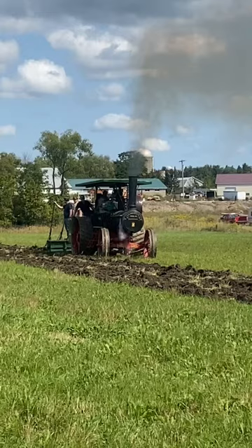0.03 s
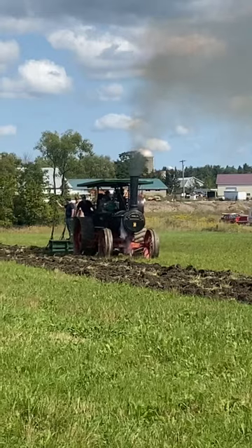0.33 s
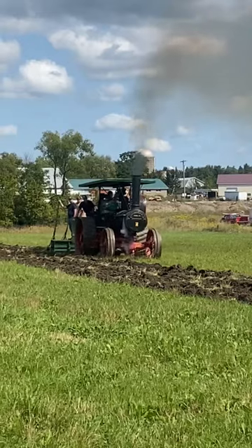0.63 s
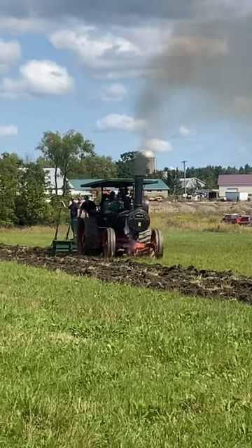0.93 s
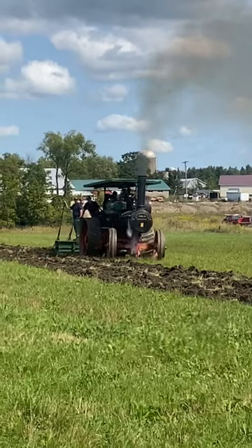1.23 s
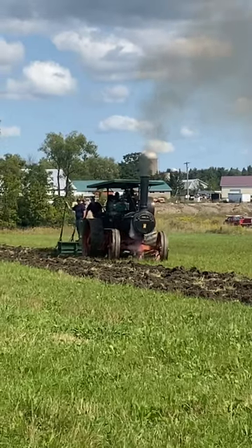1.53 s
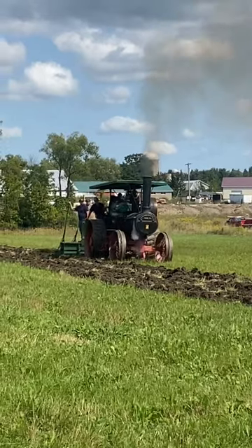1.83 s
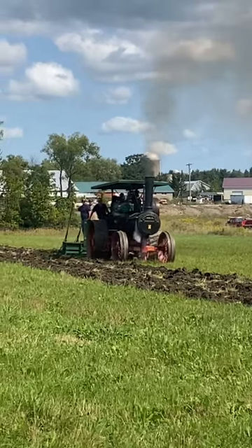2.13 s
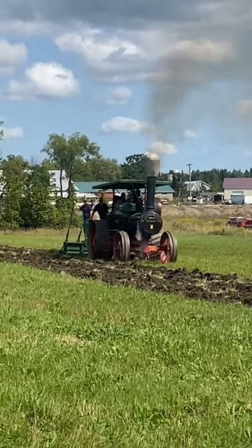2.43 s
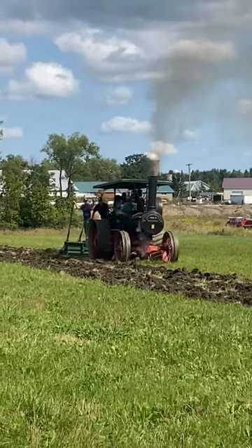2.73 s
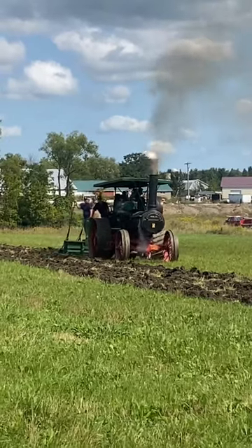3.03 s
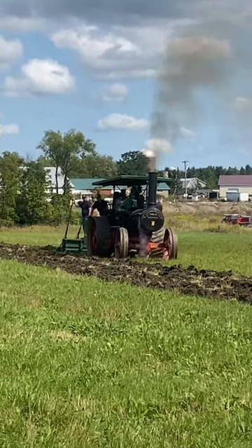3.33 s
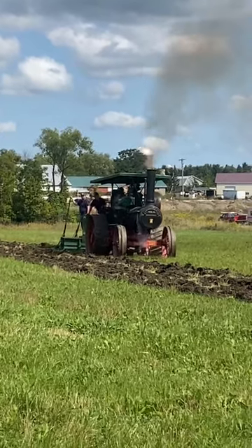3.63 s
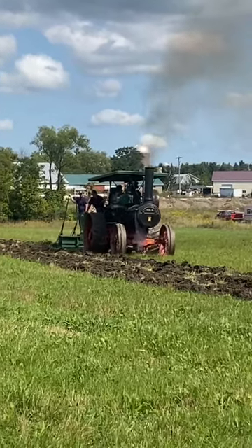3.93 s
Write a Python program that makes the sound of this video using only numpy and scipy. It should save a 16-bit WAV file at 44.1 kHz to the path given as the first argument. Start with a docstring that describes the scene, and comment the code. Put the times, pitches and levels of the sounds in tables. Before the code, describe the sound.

A steam traction engine chuffs in a fast, even rhythm across an open field, with faint boiler hiss and low rumble underneath. Wind buffets and thumps the microphone early on, then eases while the chuffing continues.

```python
"""An open field, where a steam traction engine pulls a plough, chuffing about 6.5 times a second.
Each chuff is a turbulent jet of exhaust steam that excites the resonances of the smokestack,
followed by two weak echoes and diffuse scatter from the field. Beneath the beats the boiler hisses
and the machine rumbles, while wind buffets and slaps a pair of closely spaced microphone ports."""
import sys
import numpy as np
from scipy import signal
from scipy.fft import rfft, irfft
from scipy.io import wavfile

SR = 44100
rng = np.random.default_rng(int(sys.argv[2]) if len(sys.argv) > 2 else 0)


def unload_audio(sound):
    """Save the sound as a 16-bit wav file, at the path given as the first command line argument."""
    columns = np.transpose(np.atleast_2d(sound))
    # keep every value between -1 and 1, then stretch to whole-number steps
    steps = np.round(np.clip(columns, -1, 1) * 32767)
    wavfile.write(sys.argv[1], SR, steps.astype(np.int16))


N = 176400
HZ = np.fft.rfftfreq(N, 1 / SR)
TIME = np.arange(N) / SR

# exhaust beats: t/s at full blast, level/dB, T60/s, body/dB, stack ring/dB, hiss/dB (levels relative)
BEATS = [(0.159, -10, 0.081, 2.5, -4, 3), (0.315, -10, 0.076, -0.8, -2, -0.5),
         (0.469, -11, .11, 0.5, -2, 2.5), (0.626, -9.5, 0.091, 0, -4.5, -2.7),
         (0.781, -11.5, 0.11, -1.5, 1, 2.5), (0.9341, -8.5, 0.078, -.5, -4, -0.9),
         (1.083, -6.5, 0.088, -5, -7, -0.7), (1.233, -6.5, 0.085, -5, -5, -6.5),
         (1.3762, -8.5, 0.12, -2, -5, -1.5), (1.520, -11.5, .11, 2, 0, 0.5),
         (1.664, -9.5, 0.11, 0, -2.5, 1.3), (1.807, -15.5, 0.13, 6, 2, 2.7),
         (1.9488, -9.5, 0.14, .5, -4, 0.9), (2.098, -13, 0.13, 2, 1.5, 3),
         (2.244, -10.5, 0.11, -2, 0.5, 1.8), (2.3996, -11.5, 0.15, 1.3, 0.5, 0.7),
         (2.5547, -10.5, 0.12, 2.5, -1, 2.5), (2.715, -10.5, 0.074, 2.4, .7, 0),
         (2.8755, -11.5, 0.14, 4.5, -4.5, 0.5), (3.0355, -12, .11, 3, -2.5, -0.5),
         (3.191, -13.5, 0.14, 5.5, -2, 2.5), (3.345, -13, 0.13, 3.5, -2.5, 0),
         (3.4958, -12.5, 0.15, 3.5, -3.5, 1.6), (3.647, -15.5, 0.12, 2.5, 4.5, 5.5),
         (3.794, -14.5, 0.15, 3, 0, 6.5), (3.9455, -13.5, 0.15, 2.5, -1.7, 2.5)]


def amp(db):
    """The decibel scale: 20 dB is a factor of ten in amplitude."""
    return 10 ** (np.asarray(db) / 20)


def unit(x):
    """Normalisation to an rms value of 1."""
    return x / np.sqrt(np.mean(x ** 2) + 1e-20)


def read(points, hz):
    """Interpolation of a table on a logarithmic frequency axis."""
    f, value = np.transpose(points)
    return np.interp(np.log(hz + 1), np.log(f + 1), value)


def noise(spectrum):
    """Spectral shaping: white noise filtered to the given relative levels, at rms 1."""
    return unit(irfft(rfft(rng.standard_normal(N)) * amp(read(spectrum, HZ)), N))


def wander(rate_hz):
    """Random modulation: low-pass noise of rms 1 with its cutoff at rate_hz."""
    return unit(irfft(rfft(rng.standard_normal(N)) / (1 + (HZ / rate_hz) ** 4), N))


def rumble():
    """Low-frequency noise of firebox and gearing, an uneven drone under slow amplitude modulation."""
    spectrum = [(20, -47), (45, -8), (75, 10), (120, -4.5), (155, -1), (182, 1.5), (220, -21), (350, -6),
                (600, -53)]  # f/Hz, relative spectral level/dB
    return noise(spectrum) * amp(-42.5 + 0.75 * wander(rate_hz=9.5))


def boiler_hiss():
    """Flow noise of steam and draught: a steady broadband hiss that flickers slightly."""
    spectrum = [(100, -17), (330, 3.5), (1350, 2), (2800, -1), (4200, -7.5), (6000, -12), (9000, -16),
                (12000, -26.5), (16000, -54)]  # f/Hz, relative spectral level/dB
    envelope = [(0, -34.5), (2.6, -37), (4, -36)]  # t/s, level/dB
    flicker_db = wander(rate_hz=40)
    return noise(spectrum) * amp(np.interp(TIME, *np.transpose(envelope)) + flicker_db)


def lulls():
    """Amplitude modulation of the background: a Gaussian dip in gain follows each beat."""
    depth_db, delay_s, width_s = -4.5, 0.084, 0.027
    dips = sum(np.exp(-((TIME - beat[0] - delay_s) / width_s) ** 2) for beat in BEATS)
    return amp(depth_db * dips)


def wind():
    """Turbulent pressure at the microphone: low buffeting, and a flutter of eddies as shot noise."""
    gusts = [(0.04, -21.5, -25.5), (.11, -31.5, -58), (.52, -28, -45), (.88, -32, -46), (0.938, -22, -28.5),
             (1.25, -23, -27.5), (1.41, -27, -37.5), (1.68, -35.5, -28), (1.76, -39, -39.5),
             (1.85, -41, -33), (2.24, -36, -38), (2.35, -39.5, -54), (2.95, -46, -42.5),
             (3.55, -38.5, -32.5), (4, -51, -40)]  # t/s, buffeting level/dB, flutter level/dB
    buffet_spectrum = [(18, -38), (30, -28), (46, 4), (80, -1), (125, -5.5), (200, -5.5), (2000, -115)]  # f/Hz, relative spectral level/dB
    eddy_spectrum = [(40, -33), (120, -5), (200, -3), (350, -5.5), (600, -16.5), (5000, -114)]  # f/Hz, relative spectral level/dB
    eddies_per_s, size_spread_db = 240, 4.5
    times, buffet_db, flutter_db = np.transpose(gusts)
    buffeting = noise(buffet_spectrum) * amp(np.interp(TIME, times, buffet_db))
    sizes = amp(size_spread_db * np.minimum(rng.exponential(1, N), 3))
    signs = rng.choice([-1, 1], N)
    eddies = sizes * signs * (rng.random(N) < eddies_per_s / SR)
    flutter = unit(irfft(rfft(eddies) * amp(read(eddy_spectrum, HZ)), N))
    flurries_db = 2.5 * wander(rate_hz=10)
    return buffeting + flutter * amp(np.interp(TIME, times, flutter_db) + flurries_db)


def wind_slaps():
    """Pressure transients: a hard eddy hits the microphone, and a thump swells and dies in a few cycles."""
    impacts = [(0.034, -20, 119), (0.817, -19, 105), (0.928, -12.5, 113), (0.978, -13.5, 130),
               (1.095, -21, 124), (1.136, -16, 313), (1.158, -15.5, 92), (1.277, -14, 76.5),
               (1.304, -17.5, 79.4), (1.665, -18, 172), (1.979, -20, 180), (3.429, -25, 202),
               (3.556, -21.5, 164)]  # t/s, level/dB, f/Hz
    cycles_to_peak = 0.97
    out = np.zeros(N)
    for start, db, hz in impacts:
        cycles = np.maximum(TIME - start, 0) * hz
        age = cycles / cycles_to_peak
        out += amp(db) * age * np.exp(1 - age) * np.sin(2 * np.pi * cycles)
    return out


def field_scatter(x):
    """Diffuse scattering by the ground and tree line: a faint tail in which the bass lasts longest."""
    decay_times = [(150, 0.22), (1500, 0.074), (12000, 0.067)]  # f/Hz, T60/s
    level_db, build_up_s = -18, 0.015
    hz, t, z = signal.stft(rng.standard_normal(SR // 2), SR, nperseg=256)
    decay = amp(-60 * t / read(decay_times, hz)[:, None])
    tail = signal.istft(z * decay, SR, nperseg=256)[1]
    tail *= np.minimum(np.arange(len(tail)) / SR / build_up_s, 1)
    return amp(level_db) * signal.fftconvolve(x, tail / np.linalg.norm(tail))[:N]


def add_echoes(x):
    """Early reflections: two weak, delayed copies add to each blast and roughen its tail."""
    reflections = [(0.0214, -18.5), (0.0406, -23.5)]  # delay t/s, level/dB
    return x + sum(amp(db) * np.interp(TIME - delay, TIME, x, left=0) for delay, db in reflections)


def shimmer(x):
    """Spectral modulation: smooth random patches in time and frequency give each blast its own colour."""
    depth_db, patch_hz, patch_s = 1.45, 87, 0.14
    hz, t, z = signal.stft(x, SR, nperseg=1024, noverlap=768)
    per_hz = np.fft.fftfreq(len(hz), hz[1])[:, None]
    per_s = np.fft.fftfreq(len(t), t[1])
    blur = np.exp(-2 * np.pi ** 2 * ((per_hz * patch_hz) ** 2 + (per_s * patch_s) ** 2))
    patches = unit(np.fft.ifft2(np.fft.fft2(rng.standard_normal(z.shape)) * blur).real)
    coloured = signal.istft(z * amp(depth_db * patches), SR, nperseg=1024, noverlap=768)[1][:N]
    return np.std(x) * unit(coloured)


def stack_response(hz, tuning, ring_db):
    """Pipe resonance: each mode of the smokestack is a damped oscillator that rings on after a blast."""
    modes = [(177.6, 23, 15), (329, 16.5, 12), (521, 21.5, 13), (717, 31, 6), (859.5, 35, 6.5),
             (2135, 40, 5.5), (2428, 72, 7)]  # f/Hz, bandwidth/Hz, lift/dB
    ring_hz, ring_width_hz, base_lift_db = 1344, 87, 15  # the mode whose strength varies by beat
    response = 1 + (amp(base_lift_db + ring_db) - 1) / (1 + 2j * (hz - ring_hz * tuning) / ring_width_hz)
    for centre, width, db in modes:
        response *= 1 + (amp(db) - 1) / (1 + 2j * (hz - centre * tuning) / width)
    return response


def blast_envelope(t, t60):
    """Discharge through a valve: it opens, the blast holds, then the cylinder empties exponentially."""
    rise_s, abruptness, hold_s = 0.015, 2.74, 0.0061
    opening = np.exp(-(np.maximum(-t, 0) / rise_s) ** abruptness)
    return opening * amp(-60 * np.maximum(t - hold_s, 0) / t60)


def exhaust():
    """Source and filter: bursts of turbulent jet noise in three bands excite the smokestack."""
    jet_spectrum = [(30, -58), (120, -21.5), (250, -14.5), (400, -3), (465, -11.5), (600, -3.5),
                    (950, -2.5), (1120, -9.5), (1550, -2.2), (2000, -0.36), (2250, -7), (2800, -5.5),
                    (3200, -11), (5200, -15.5), (6500, -18), (8500, -18), (11000, -27), (16000, -45)]  # f/Hz, relative spectral level/dB
    body_hz, hiss_hz, trim_db = 1240, 2900, -2
    drift = 0.0084  # rms fraction by which the hot gas retunes the stack for each beat
    body_band = 1 / (1 + (HZ / body_hz) ** 6)
    hiss_band = 1 - 1 / (1 + (HZ / hiss_hz) ** 6)
    bark_band = 1 - body_band - hiss_band
    jet = rfft(noise(jet_spectrum))
    jet /= np.std(irfft(jet * stack_response(HZ, tuning=0.87, ring_db=0), N))
    turbulence = amp(1.32 * wander(rate_hz=230))  # makes the blast lumpy
    body, bark, hiss = [turbulence * irfft(jet * band, N) for band in (body_band, bark_band, hiss_band)]
    out, size = np.zeros(N), SR // 2
    for peak_s, db, t60, body_db, ring_db, hiss_db in BEATS:
        first = int((peak_s - 0.06) * SR)  # room for the valve to open
        span = slice(first, first + size)
        t = TIME[span] - peak_s
        burst = amp(body_db) * body[span] * blast_envelope(t, 0.99 * t60)
        burst += (bark[span] + amp(hiss_db) * hiss[span]) * blast_envelope(t, t60)
        tuning = 1 + drift * rng.standard_normal()
        stack = stack_response(np.fft.rfftfreq(size, 1 / SR), tuning, ring_db)
        out[span] += amp(trim_db + db) * irfft(rfft(burst, size) * stack, size)[:len(t)]
    return out


def engine_and_wind(blast_db, ambient_db):
    """Superposition of the echoing blasts and the ambient sound, with fresh noise at each call."""
    blasts = add_echoes(shimmer(exhaust()))
    ambient = field_scatter(blasts) + lulls() * (boiler_hiss() + rumble()) + wind()
    return amp(blast_db) * blasts + amp(ambient_db) * ambient


def scene():
    """Partial coherence: two close ports share most of the sound, offset in level and phase."""
    side_spectrum = [(20, -28), (200, -20), (3000, -18), (6000, -11), (7200, -32), (8800, -9), (10500, -18),
                     (12000, -10), (13300, -28), (15000, -9)]  # incoherent part: f/Hz, level/dB
    balance = [(20, 0), (400, 0), (870, 4.2), (1100, 1.6), (1400, 4.2), (1700, 1.5), (2600, 0)]  # f/Hz, left minus right level/dB
    phase_lead = [(20, 0), (5200, .15), (6000, 1.5), (6900, 3.1), (7500, 3.15), (9400, 5.3), (9750, 6.28),
                  (11600, 6.3), (12600, 9.4), (14400, 9.45), (15300, 12.4)]  # f/Hz, lead of the left port/rad
    mid = rfft(engine_and_wind(blast_db=0, ambient_db=0) + wind_slaps())
    # direct blasts are more coherent between the ports than diffuse sound is
    side = rfft(engine_and_wind(blast_db=-2, ambient_db=4.5)) * amp(read(side_spectrum, HZ))
    half_offset = amp(read(balance, HZ) / 2) * np.exp(0.5j * read(phase_lead, HZ))
    left = irfft((mid + side) * half_offset, N)
    right = irfft((mid - side) / half_offset, N)
    return np.array([left, right])


def record(dry):
    """Soft saturation and band limiting: after an instant of silence the sound opens, its peaks rounded."""
    start_s, fade_s, cutoff_hz = 0.036, 0.002, 15850
    opened = dry * np.clip((TIME - start_s) / fade_s, 0, 1)
    rounded = opened / (1 + opened ** 8) ** (1 / 8)
    low_pass = signal.firwin(511, cutoff_hz, window=("kaiser", 9), fs=SR)
    return signal.oaconvolve(rounded, low_pass[None], "same")


dry = scene()
out = record(dry)
unload_audio(out)
```